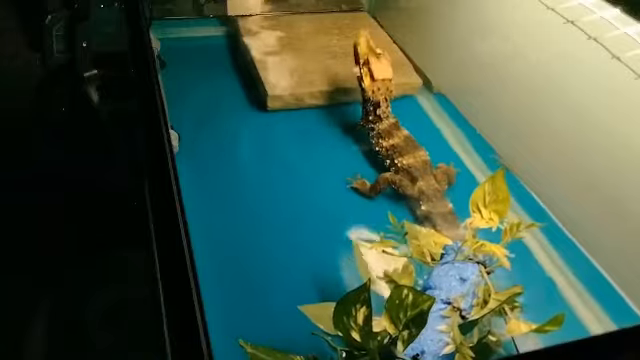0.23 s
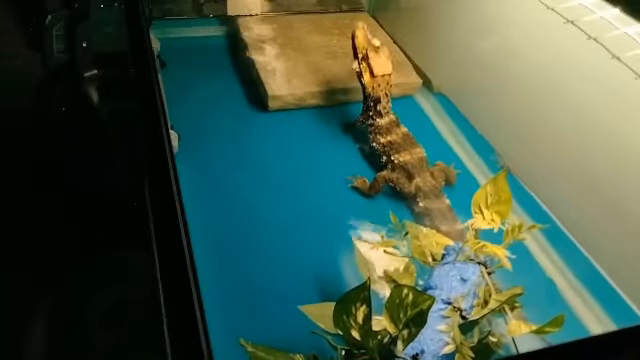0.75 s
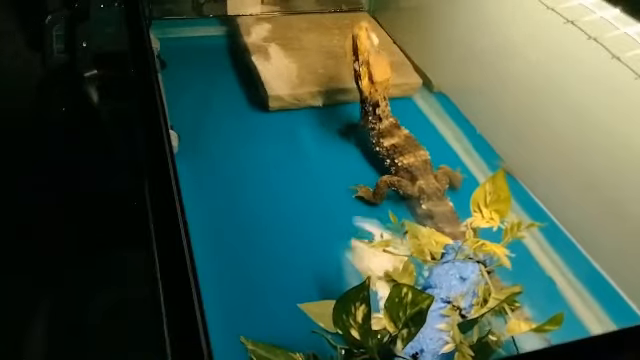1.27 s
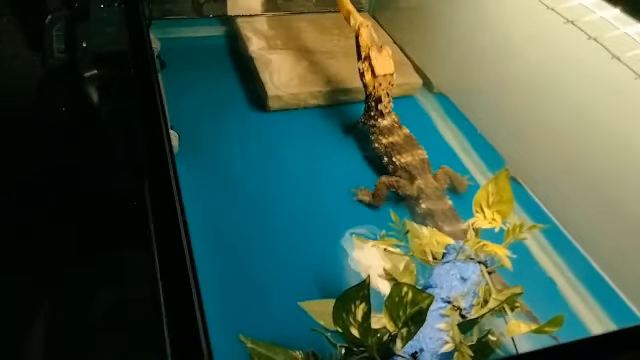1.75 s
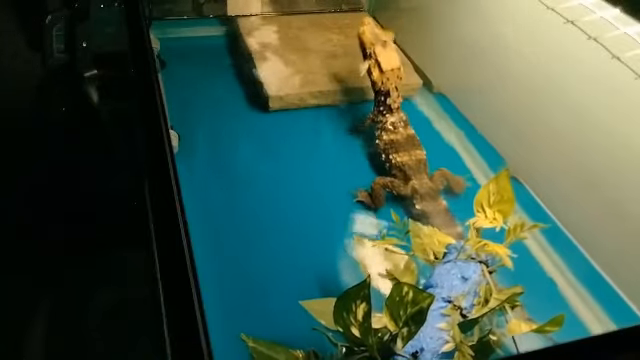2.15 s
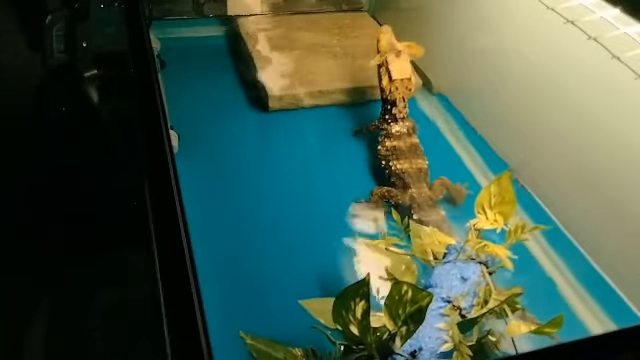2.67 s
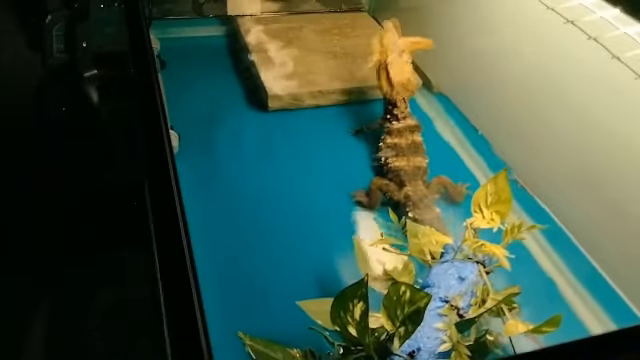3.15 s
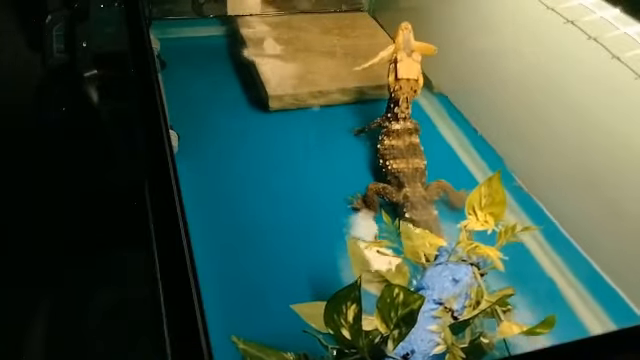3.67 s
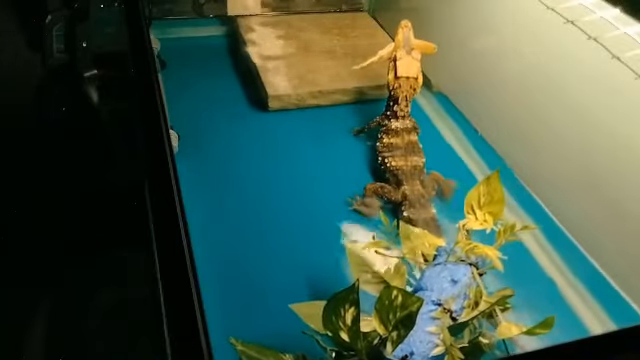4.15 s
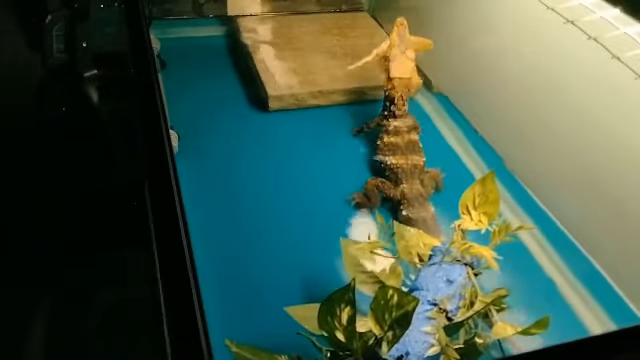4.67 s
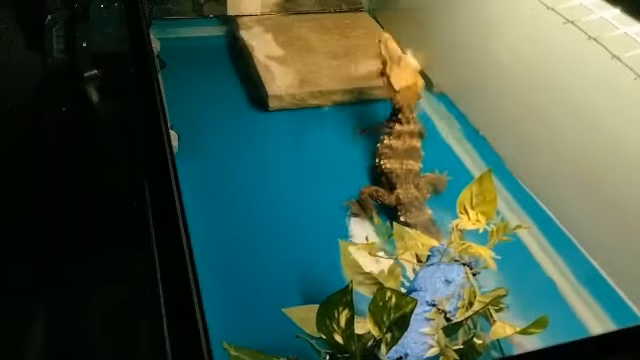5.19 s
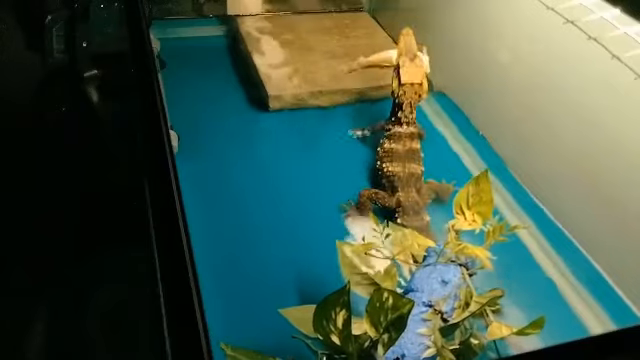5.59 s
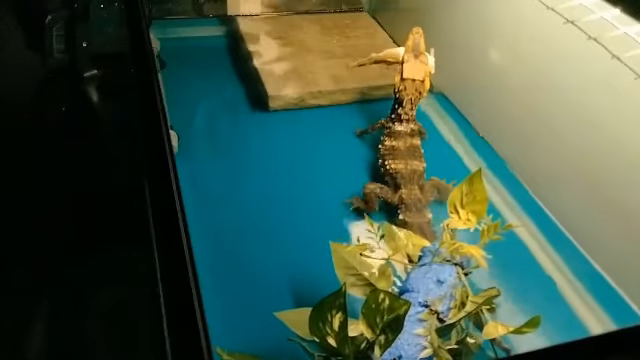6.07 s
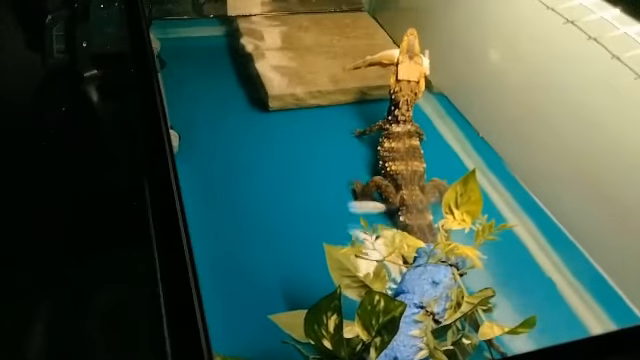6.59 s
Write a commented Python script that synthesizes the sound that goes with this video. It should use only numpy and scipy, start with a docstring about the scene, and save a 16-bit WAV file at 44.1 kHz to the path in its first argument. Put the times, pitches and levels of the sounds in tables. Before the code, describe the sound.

Throughout about seven seconds, a low motor hum near 50 and 120 Hz sits under a soft rush of air and a gently throbbing, fluttering hiss in an indoor tank. A faint crackle and tiny click open the scene, with a small bubble plink at 0.2. At 0.42 comes the loudest bite: a tight, bright bone crack with wet tearing, a soft bump and a short ringing tail. Soft noise swishes follow at 0.7 and 0.9, with faint crackles from 1.1 to 1.5. Swishes return at 2.1 and 2.4, then snaps cluster from 2.5 to 2.65 with a thud, squelch and bubbles. A lighter wet click comes at 3.3, swishes at 3.8 and 4.0, and faint clicks at 4.8. Swishes at 5.3 and 5.5 overlap bumps and a rapid crunchy burst around 5.5, with a high plink. Hum and air continue to a last swish at 6.8.

```python
"""A caiman's jaws chew a fish on a slab in an indoor tank: bones snap as short pitched noise bursts,
several together in a big snap, and flesh squelches as swarms of tiny ringing pops. A few bubbles
plink as gliding, decaying sines. The hard tank walls give the bites a short bright tail of dense
decaying noise and ringing modes. Motor tones hum, moving air rushes and hisses as coloured noise,
low thuds sound on the slab, and soft noise swishes come mostly in pairs, perhaps from a small drive."""
import sys
import numpy as np
from scipy import signal
from scipy.fft import rfft, irfft, next_fast_len
from scipy.io import wavfile
from scipy.ndimage import map_coordinates

SR = 44100
rng = np.random.default_rng(int(sys.argv[2]) if len(sys.argv) > 2 else 0)


def to_wav(sig):
    """Store sig (one row per channel, or 1-D mono) as 16-bit WAV at the path in sys.argv[1].

    Samples outside -1..1 are clipped; the rate is SR.
    """
    pcm = np.clip(np.atleast_2d(sig), -1, 1) * 32767
    pcm = np.round(pcm).astype(np.int16)
    wavfile.write(sys.argv[1], SR, pcm.T)  # frames by channels


N = 301189
TIME = np.arange(N) / SR
TOP_HZ = 15850  # upper band limit of the whole scene

# Tones of the pump motors and the mains: f/Hz, rms level/dB
MOTOR_TONES = [(50.55, -51), (58.7, -66), (60, -66), (120, -52.5), (189.5, -73), (202.2, -62.5), (221, -72),
               (240, -58), (271.3, -69), (293.5, -61), (303.3, -68), (322, -70), (352.2, -64), (360, -67.5),
               (372.5, -72)]
# Spectrum of the rush of moving air: f/Hz, relative level/dB
AIR_SPECTRUM = [(20, -15), (45, 0), (100, 1.5), (150, -1), (290, 0), (460, -5), (510, -1.5), (560, -5.5),
                (750, -10.5), (1050, -11.5), (1700, -14.5), (2800, -18.5), (4000, -10), (6100, -17.5),
                (8300, -30.5), (12000, -30)]
# Resonances of the hiss: f/Hz, width/Hz, relative level/dB
HISS_RESONANCES = [(2060, 118, -7), (2373, 111, -7), (3506, 345, -15), (4400, 22, -10.5),
                   (5050, 480, -12.5), (5800, 12, -17), (7060, 740, -20.5), (9600, 610, -29.5)]
# Balance of the moving air: f/Hz, left minus right/dB
AIR_BALANCE = [(200, -1), (600, -0.5), (1200, -5.5), (2400, -8), (4400, -2), (8000, -4)]
# Correlation of left and right in the noise sounds: f/Hz, correlation (1 = identical)
LEFT_RIGHT_CORRELATION = [(60, 0.6), (130, 0.75), (290, 1), (640, 0.2), (1400, 0.12), (3000, 0.066)]
MOTOR_HZ, THROB_DB = 29.6, 1.8  # motor turns per second, and the depth of the hiss's throb

# Resonances of the slab: f/Hz, width/Hz, relative level/dB
SLAB_RESONANCES = [(298, 160, -8), (415, 156, 17.5), (645, 80, 21), (990, 220, 16), (1490, 220, 14)]
# Fish and feet bumping on the slab: t/s, level/dB, half length/s
SLAB_BUMPS = [(0.433, -50, 0.014), (2.495, -54, 0.015), (2.579, -36, 0.0015), (2.6, -51.5, 0.025),
              (5.27, -44.5, 0.014), (5.298, -49.5, 0.012), (5.546, -54, .025)]
DRAG_AT_S, DRAG_DB, DRAG_HALF_S = 0.5, -54, 0.54  # the body drags softly around the first bite

# Chews: t/s, skin crackle level/dB, length/s, skin centre f/Hz, pulp relative to skin/dB
CHEW_EVENTS = [(0.058, -63, 0.1, 5000, -2), (0.4203, -32, 0.025, 9100, -12.5),
               (1.063, -58, 0.022, 10000, -11), (1.42, -48, 0.016, 7060, -20),
               (1.456, -51, 0.018, 6000, -18), (2.022, -51.5, 0.037, 7000, -18),
               (2.48, -59, 0.016, 9000, 0), (2.506, -46.5, 0.028, 8140, -19),
               (2.574, -37.5, 0.014, 11000, -3), (2.645, -60, 0.011, 6000, 4),
               (3.236, -57, 0.036, 8000, -14), (3.27, -44.5, 0.023, 8000, -4.5),
               (3.415, -63, 0.022, 4000, -8), (4.827, -56.5, 0.052, 9050, -3),
               (5.274, -52.5, 0.037, 9000, -8), (5.501, -49, 0.018, 8500, 4),
               (5.514, -34.5, 0.03, 12000, -12.5)]
SKIN_OCTAVES = 0.74  # half-width of the crackle's spectral peak
PULP_LAG_S, PULP_HZ, PULP_OCTAVES = 0.007, 2030, 0.43  # delay, centre and half-width of the squelch
FLESH_WET_DB = 2  # tank echo of skin and pulp

# Parts of bone snaps, several rows for a big one:
# t/s, level/dB, centre f/Hz, left minus right/dB, half-width/octaves, length/s
SNAP_PARTS = [(0.172, -43.5, 8300, -3, .25, 0.0039), (0.4162, -21.5, 4200, -8, .17, 0.0026),
              (0.4186, -19, 6050, 0, 0.11, 0.0023), (0.4187, -23.5, 9300, -12, .13, 0.0029),
              (0.4203, -24, 13200, -10, .25, .003), (0.4205, -21.5, 6500, -9, 1.15, 0.0018),
              (0.4253, -29, 6000, -2, 1.3, 0.0011), (1.148, -52, 6560, 9, .1, .0025),
              (1.224, -53.5, 9500, 0, .3, .0025), (2.5063, -38.5, 4400, 5, .13, .004),
              (2.5067, -37.5, 10000, 0, .5, .003), (2.51, -43, 5000, 12, .4, .002),
              (2.5787, -24, 8500, 0, 1.8, 0.0016), (2.5788, -30, 5300, 5, 0.1, 0.0042),
              (2.59, -29.5, 7260, 8, 0.14, 0.002), (2.5908, -31, 11000, -10, 0.28, 0.0052),
              (2.6471, -31, 7400, 4, 0.095, 0.0025), (2.6473, -36, 10500, -1, .7, .002),
              (3.281, -41, 4900, 12, 0.14, 0.0045), (3.285, -44, 5600, 9, .5, .0023),
              (3.296, -44, 4000, 2, .8, 0.0022), (4.791, -49, 13000, -3, .44, 0.0045),
              (4.823, -47, 9000, -1, .3, 0.0048), (5.519, -35, 11500, -3, .4, .002),
              (5.525, -28.5, 8900, -4, 0.11, .003), (5.531, -29, 5900, 1, .45, 0.0018),
              (5.536, -33, 7900, 2, .18, .003), (5.539, -35, 7500, 4, .5, .002),
              (5.551, -37, 6000, -1, .4, .002), (5.559, -36, 3100, 0, 0.27, .004),
              (5.578, -41, 8500, -2, .4, .002)]
# Colour shared by bone, skin and pulp: f/Hz, gain/dB
BITE_COLOUR = [(200, -14), (700, -14), (1900, -1.5), (2900, 4), (6000, 0.5), (8000, -1.5), (9700, -3.5),
               (14500, -1), (15800, -2)]
# How the jaws' sound reaches the two sides: f/Hz, left minus right/dB
JAW_BALANCE = [(1000, -9), (2500, 0.5), (5000, 4), (7000, 3.5), (9500, -6.5), (14000, 1)]
SNAP_S, SNAP_WET_DB = 0.0022, -1.8  # time over which a snap part's level is taken; its tank echo
SNAP_ECHO_OCTAVES = 0.55  # walls gather sound from all directions: the echo is this much broader

# Reverberation time of the tank: f/Hz, t60/s
TANK_T60 = [(300, 0.11), (1200, 0.11), (3000, 0.17), (8000, 0.17), (15000, 0.14)]
# Modes of the hard tank after a snap: f/Hz, level before focus on the snap part's pitch/dB
TANK_MODES = [(3154, -14.5), (4279, -14), (4882, -15), (5452, -23), (6089, -19), (6274, -19), (9009, -17),
              (9380, -19), (9794, -23), (14620, -24)]
RING_RISE_S, RING_T60_S = 0.0027, 0.13  # build-up time constant and t60 of these modes

# Small bubbles: t/s, level/dB, starting f/Hz, t60/s
BUBBLE_EVENTS = [(0.2145, -37, 1574, 0.036), (2.490, -44, 1216, 0.13), (2.488, -47, 875, 0.05),
                 (2.514, -49, 1060, .06), (2.589, -42, 1660, 0.044), (2.649, -42.5, 1730, 0.042),
                 (3.297, -36.5, 3100, .045), (5.521, -22.5, 9530, 0.019), (5.522, -46, 1410, 0.052),
                 (5.529, -43.5, 974, 0.067)]
BUBBLE_RISE = 0.02  # at t60 the pitch has risen by twice this share
BUBBLE_WET_DB = 2  # tank echo of a bubble

# Swishes, mostly in pairs: middle t/s, half length/s
SWISH_TIMES = [(0.678, 0.063), (0.91, 0.065), (2.138, 0.063), (2.376, 0.063), (3.766, .072), (4.024, 0.067),
               (5.258, 0.066), (5.49, 0.054), (6.777, 0.069)]
# Spectrum of a swish: f/Hz, relative level/dB
SWISH_SPECTRUM = [(700, -7), (1600, -8), (2050, 5), (2600, 0), (4300, 4), (5500, 0.5), (6300, -10.5),
                  (7600, -10.5), (8400, -58), (10000, -18.5), (11600, -7), (15500, -8)]
SWISH_DB = -41


def amp(db):
    """Amplitude gain is ten to the power of a twentieth of the level in decibels."""
    return 10 ** (np.asarray(db) / 20)


def unit(x):
    """Root-mean-square normalization to 1."""
    return x / np.sqrt(np.mean(x ** 2) + 1e-20)


def along(points, hz):
    """Interpolation of (f/Hz, value) points on a logarithmic frequency axis."""
    f, v = np.transpose(points)
    return np.interp(np.log(hz + 1), np.log(f + 1), v)


def sides(pan_db):
    """Stereo position by level difference: half the decibels up on the left, half down on the right."""
    return amp(np.array([[.5], [-.5]]) * pan_db)


def filtered(x, response):
    """Linear filtering: the spectrum is multiplied by a frequency response."""
    n = x.shape[-1]
    m = next_fast_len(n + 8192)
    spectrum = rfft(x, m)
    return irfft(spectrum * response(np.fft.rfftfreq(m, 1 / SR)), m)[..., :n]


def resonances(modes, hz):
    """Superposition of bell-shaped resonance gains."""
    return sum(amp(db) * np.exp(-((hz - centre) / width) ** 2) for centre, width, db in modes)


def focus(hz, centre_hz, octaves, order=1):
    """Gain of a spectral peak, 3 dB down at the half-width; a higher order gives steeper skirts."""
    distance = np.log2((hz + 1) / centre_hz) / octaves
    return 1 / np.sqrt(1 + distance ** (2 * order))


def add(track, s, sound):
    """Superposition of a sound on a track from time s onward."""
    start = round(s * SR)
    track[:, start:start + sound.shape[-1]] += sound[:, :N - start]


def wobble(rate):
    """Smooth random modulation: a spline through random knots, rate of them per second."""
    return map_coordinates(rng.standard_normal(4096), [TIME * rate], mode="wrap")


def rush(response):
    """Coloured stereo noise of rms 1, correlated in the bass and nearly independent in the treble."""
    def mid_and_side(hz):
        # mid and side powers in this ratio give the wanted correlation
        turn = np.arccos(np.clip(along(LEFT_RIGHT_CORRELATION, hz), -1, 1)) / 2
        return response(hz) * np.array([np.cos(turn), np.sin(turn)])

    mid, side = filtered(rng.standard_normal((2, N)), mid_and_side)
    return unit(np.array([mid + side, mid - side]))


def pumps(waver_db=0.96, wide_hz=330):
    """Rotating machines and mains give line spectra; left-right phase difference grows with pitch."""
    out = np.zeros((2, N))
    for hz, db in MOTOR_TONES:
        phase_gap = rng.choice([-1, 1]) * hz / wide_hz  # radians
        phase = rng.uniform(0, 2 * np.pi) + np.array([[.5], [-.5]]) * phase_gap
        level = amp(db + waver_db * wobble(3.93))
        out += level * np.sqrt(2) * np.sin(2 * np.pi * hz * TIME + phase)
    return out


def air(rumble_db=-51, hiss_db=-54, drift_db=1.5, flicker_db=1.56, surge_db=1):
    """Flow noise: a surging rush, and a resonant hiss modulated at random and once per motor turn."""
    surge = amp(rumble_db + surge_db * wobble(7))
    rumble = surge * rush(lambda hz: amp(along(AIR_SPECTRUM, hz)))
    throb = THROB_DB * np.sin(2 * np.pi * MOTOR_HZ * TIME)
    flow = amp(drift_db * wobble(2.12) + flicker_db * wobble(16) + throb)
    hiss = amp(hiss_db) * flow * rush(lambda hz: resonances(HISS_RESONANCES, hz))
    return filtered(rumble + hiss, lambda hz: sides(along(AIR_BALANCE, hz)))


def slab():
    """Forced vibration: bumps and one slow drag excite the low resonances of the slab."""
    level = amp(DRAG_DB) * np.exp(-((TIME - DRAG_AT_S) / DRAG_HALF_S) ** 2)
    for s, db, half in SLAB_BUMPS:
        level += amp(db) * np.exp(-((TIME - s) / half) ** 2)
    return level * rush(lambda hz: resonances(SLAB_RESONANCES, hz))


def tank_echo(x, wet_db, pan_db=0, build=.004, clump_db=2.5, clump_hz=700):
    """Reverberation: dense wall reflections in uneven clumps, decaying at a rate set by frequency."""
    hz, t, z = signal.stft(rng.standard_normal((2, SR // 3)), SR, nperseg=256)
    decay = amp(-60 * t / along(TANK_T60, hz)[:, None])
    tail = signal.istft(z * decay, SR, nperseg=256)[1]
    t = TIME[:tail.shape[1]]
    clumps = map_coordinates(rng.standard_normal(256), [t * clump_hz], mode="wrap")
    tail = tail * (1 - np.exp(-t / build)) * amp(clump_db * clumps)
    tail = tail / np.linalg.norm(tail[0])
    return signal.fftconvolve(x, amp(wet_db) * sides(pan_db / 2) * tail, axes=1)


def in_tank(x, wet_db, pan_db=0):
    """Superposition of direct sound and its reverberation, the echo panned half as far."""
    out = tank_echo(x, wet_db, pan_db)
    add(out, 0, sides(pan_db) * x)
    return out


def shaped(burst, length, centre_hz, octaves, order=1):
    """Band-limited resonant colouring of a burst, its energy set to rms 1 over the given length."""
    def response(hz):
        peak = focus(hz, centre_hz, octaves, order)
        return amp(along(BITE_COLOUR, hz)) * peak * (hz < TOP_HZ)

    burst = filtered(burst, response)
    return burst / np.linalg.norm(burst, axis=1, keepdims=True) * np.sqrt(length * SR)


def crackle(length, count=150, life=.0008, spread_db=4.5):
    """Granular sound: many tiny wet pops, each a briefly ringing oscillator at its own pitch."""
    t = TIME[:SR // 300]
    when = length * rng.beta(1.8, 2.2, (count, 1)) * np.sqrt(2)
    hz = rng.uniform(500, TOP_HZ, (count, 1))
    size = amp(spread_db * rng.standard_normal((count, 1)))
    cycles = hz * t + rng.random((2, count, 1))  # independent phase on each side
    pops = size * np.exp(-t / life) * np.sin(2 * np.pi * cycles)
    index = (when * SR).astype(int) + np.arange(len(t))
    # sum overlapping pops sample by sample
    return np.array([np.bincount(index.ravel(), side.ravel()) for side in pops])


def chews():
    """Impulsive tearing: the skin crackles, then a duller pulp squelch follows as the teeth sink in."""
    out = np.zeros((2, N))
    for s, db, length, hz, pulp_db in CHEW_EVENTS:
        skin = shaped(crackle(length), length, hz, SKIN_OCTAVES)
        pulp = shaped(crackle(length), length, PULP_HZ, PULP_OCTAVES)
        add(out, s, amp(db) * in_tank(skin, FLESH_WET_DB))
        add(out, s + PULP_LAG_S, amp(db + pulp_db) * in_tank(pulp, FLESH_WET_DB))
    return out


def fracture(length, break_s=.0004, break_db=2, even=.7):
    """Brittle fracture: a sharp tick, then the running crack's broad noise, different on each side."""
    t = TIME[:SR // 16]
    tick = amp(break_db) * t / break_s * np.exp(1 - (t / break_s) ** 2)
    run = (1 - np.exp(-t / break_s)) * np.exp(-(t / length) ** 2)
    z = rfft((tick + run) * rng.standard_normal((2, len(t))), 2 * len(t))
    flattened = z / (np.abs(z) + 1e-9) ** even  # partly evens out the spectrum
    return irfft(flattened)[:, :len(t)]


def ringing(centre_hz, octaves):
    """Modal excitation: tank modes near a given pitch build up and decay exponentially."""
    t = TIME[:SR // 4]
    modes = 0
    for hz, db in TANK_MODES:
        cycles = hz * t + rng.random() + rng.random((2, 1)) / 2
        modes = modes + amp(db) * focus(hz, centre_hz, octaves) * np.sin(2 * np.pi * cycles)
    return modes * (1 - np.exp(-t / RING_RISE_S)) * amp(-60 * t / RING_T60_S)


def snaps():
    """Release of strain: each row gives one short pitched part of a snap; a big snap takes several rows."""
    out = np.zeros((2, N))
    for s, db, hz, pan_db, octaves, length in SNAP_PARTS:
        burst = fracture(length)
        direct = shaped(burst, SNAP_S, hz, octaves, order=2)
        broad = shaped(burst, SNAP_S, hz, octaves + SNAP_ECHO_OCTAVES, order=2)
        add(out, s, amp(db) * sides(pan_db) * direct)
        add(out, s, amp(db) * tank_echo(broad, SNAP_WET_DB, pan_db))
        add(out, s, amp(db) * ringing(hz, octaves))
    return out


def jaws():
    """Transmission from one source: chews and snaps share a left-right balance set by frequency."""
    return filtered(chews() + snaps(), lambda hz: sides(along(JAW_BALANCE, hz)))


def bubbles(blur_hz=45):
    """Damped bubble oscillation: a brief ring, its pitch rising with slight random phase drift."""
    out, t = np.zeros((2, N)), TIME[:SR // 4]
    for s, db, hz, t60 in BUBBLE_EVENTS:
        glide = 1 + BUBBLE_RISE * t / t60
        drift = np.cumsum(rng.standard_normal(len(t))) * np.sqrt(2 * np.pi * blur_hz / SR)
        envelope = amp(db - 60 * t / t60) * (1 - np.exp(-t / 0.00069))
        ring = envelope * np.sin(2 * np.pi * hz * t * glide + drift)
        add(out, s, in_tank(ring[None], BUBBLE_WET_DB, pan_db=-3.0))
    return out


def swishes(pan_db=-2, steep=2.5, rough_db=1.5):
    """Amplitude-modulated noise: every swish swells and fades symmetrically, with a slight rasp."""
    swells = sum(np.exp(-np.abs((TIME - s) / half) ** steep / 2) for s, half in SWISH_TIMES)
    level = amp(SWISH_DB) * swells * amp(rough_db * wobble(90))
    return level * sides(pan_db) * rush(lambda hz: amp(along(SWISH_SPECTRUM, hz)))


def scene():
    """Superposition of the steady room sounds, the feeding caiman and the swishes."""
    return pumps() + air() + slab() + jaws() + bubbles() + swishes()


def record(dry):
    """Band limitation: nothing at or above the upper limit passes."""
    return filtered(dry, lambda hz: hz < TOP_HZ)


dry = scene()
out = record(dry)
to_wav(out)
```